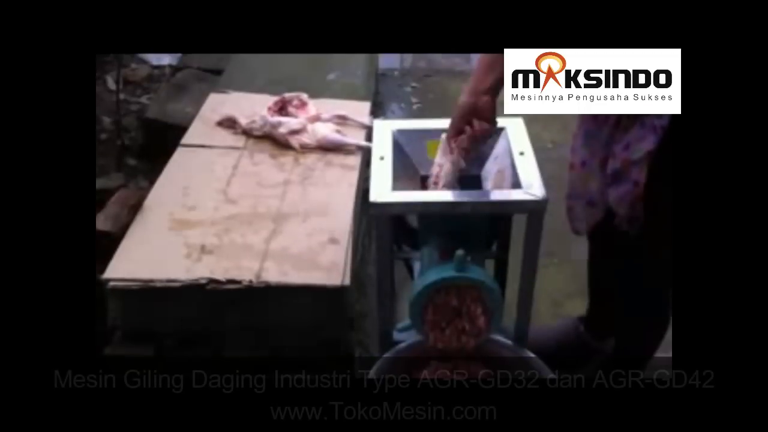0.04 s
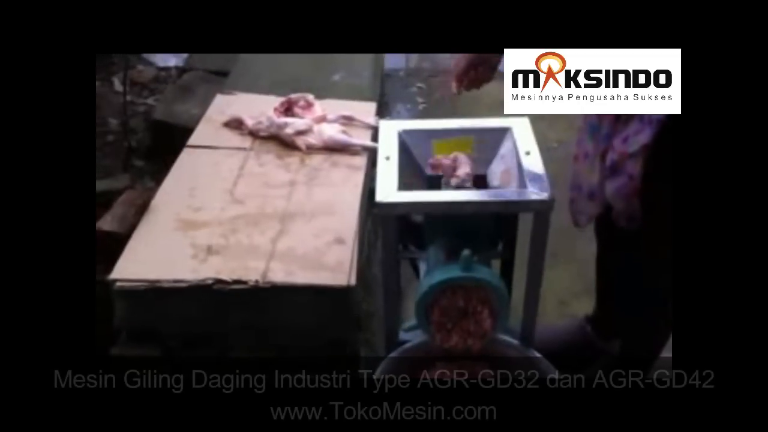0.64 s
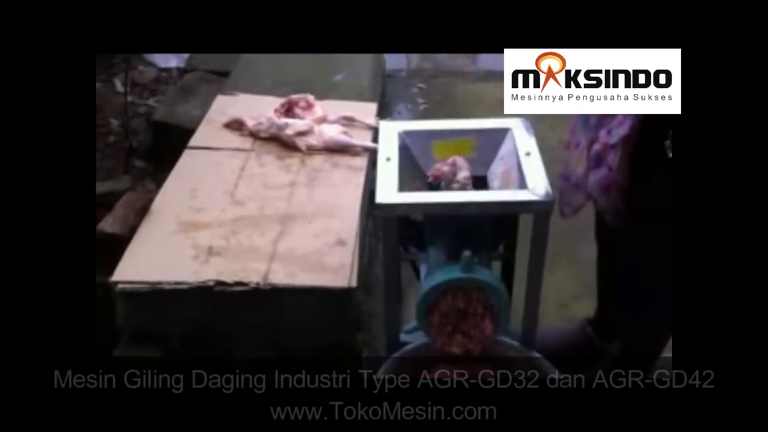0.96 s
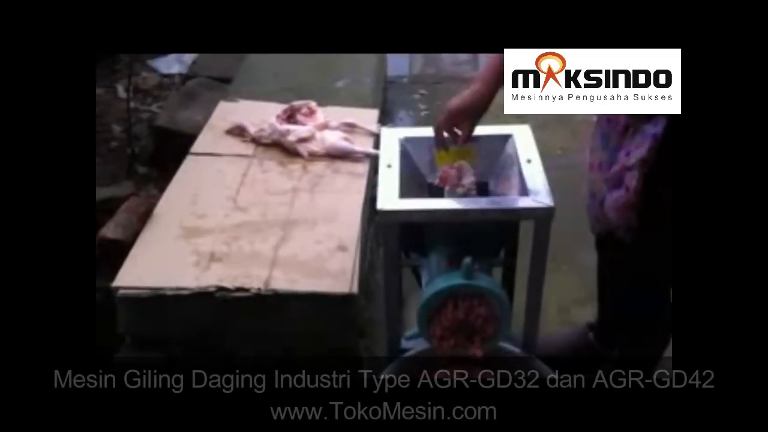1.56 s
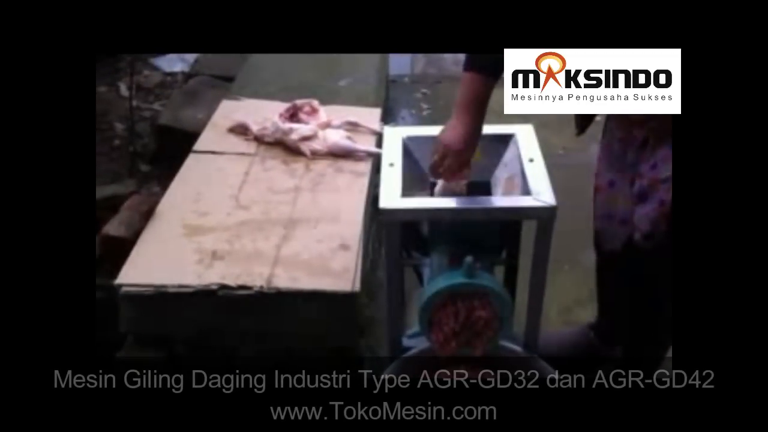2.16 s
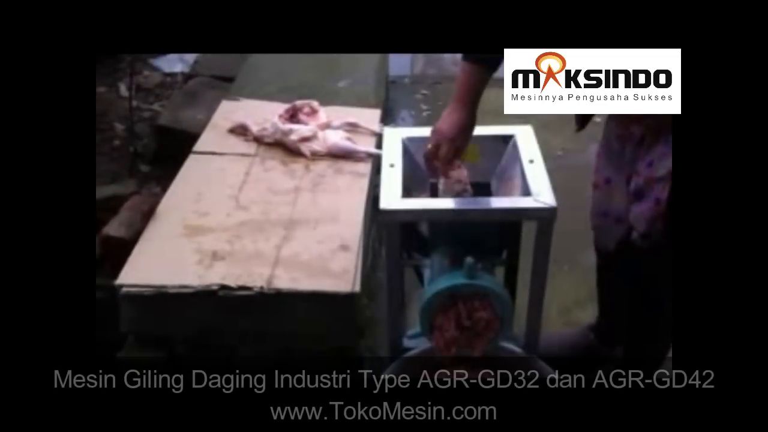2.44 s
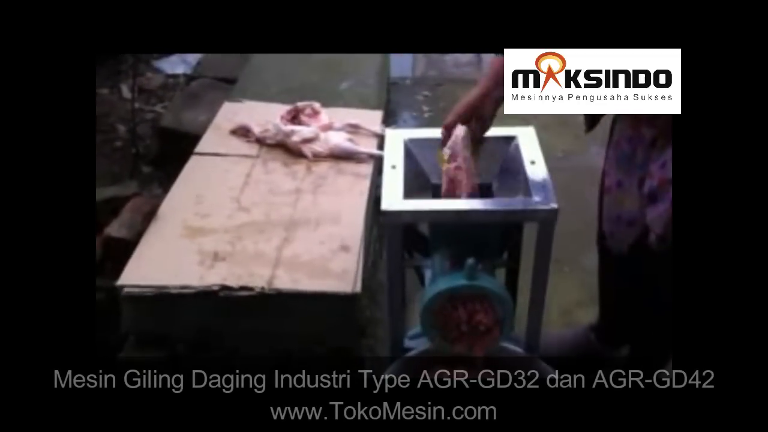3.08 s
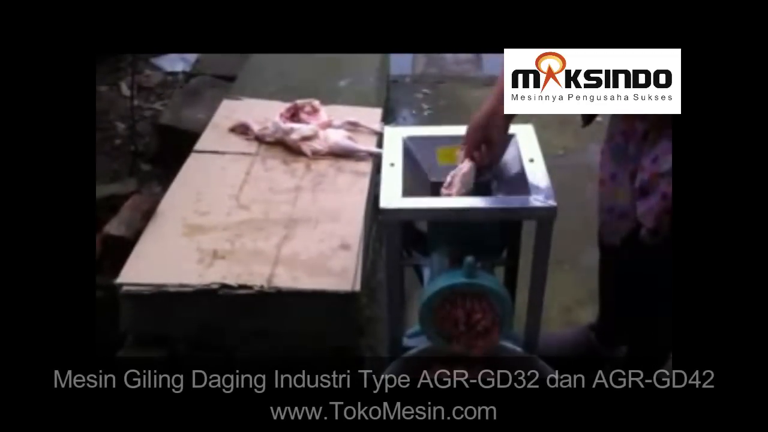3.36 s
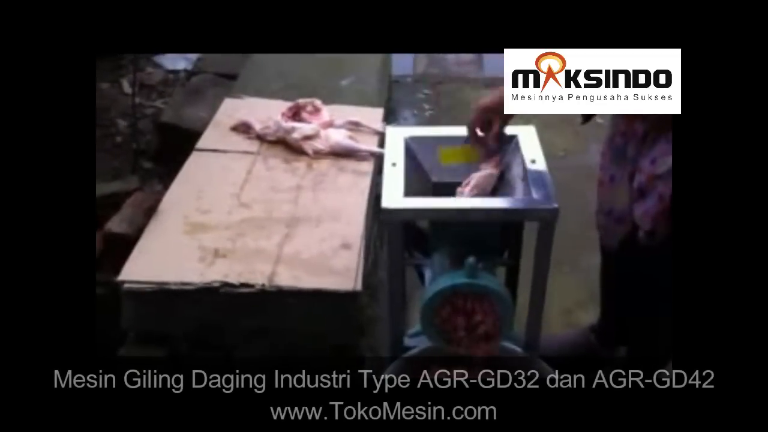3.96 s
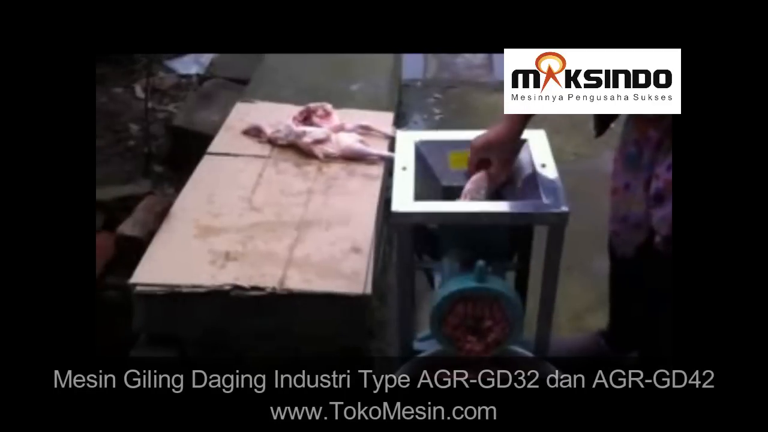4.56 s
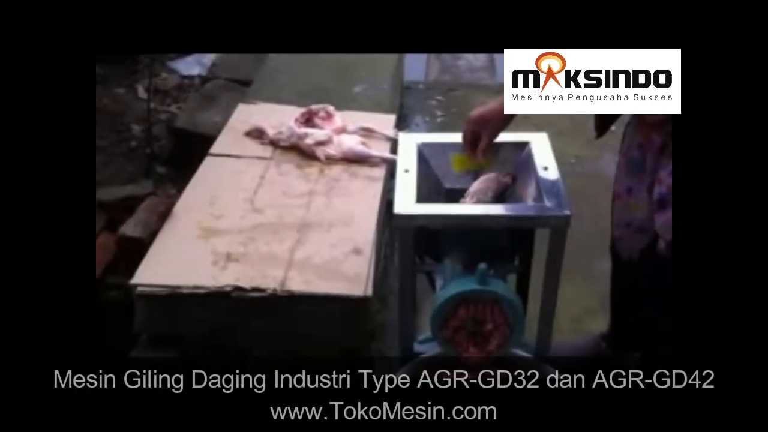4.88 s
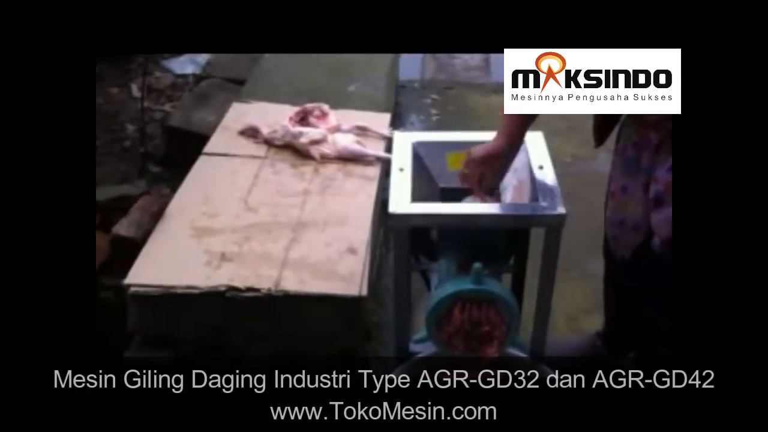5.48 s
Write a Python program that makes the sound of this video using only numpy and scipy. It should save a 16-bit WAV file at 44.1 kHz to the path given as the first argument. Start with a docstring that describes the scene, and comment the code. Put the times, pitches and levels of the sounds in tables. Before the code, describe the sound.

An electric meat grinder runs close to the microphone for about five and a half seconds, over a faint low outdoor rumble. Motor and gears hum with a slight waver, and the screw gives a throbbing drone that rattles the metal housing. A dense, moist crunch of chicken being mashed continues throughout, swelling whenever a piece is caught. Bones crack irregularly, some sharp and some dull, ringing briefly in the steel hopper; stronger cracks come around 0.1, 0.7, 1.1, 2.1 and 3.6 seconds, then cluster from 4.2 to 5.1. Hard lumps knock dully in the barrel, mostly between 0.7 and 1.9 seconds and again from 3.3 to 4.5. Wet gristle snaps and tiny squeaks are scattered through the crunch. The housing judders briefly at about 2.1 and 5.2 seconds, and a sharp, bright bone crack lands near 5.4 as the machine keeps running.

```python
"""Meat grinder in a yard

Outdoors, with the microphone close to an electric grinder being fed chicken pieces. Over the low
rumble of the yard, motor and gears hum and the auger drones and shakes its cast housing. Meat is
mashed with a dense crunch, bones crack and squeak, gristle snaps wetly and hard lumps knock on the
barrel. The crunch and the cracks ring in the steel hopper."""
import sys
import numpy as np
from scipy import signal
from scipy.fft import rfft, irfft
from scipy.io import wavfile
from scipy.ndimage import uniform_filter1d

SR = 44100
rng = np.random.default_rng(int(sys.argv[2]) if len(sys.argv) > 2 else 0)


def to_wav(sig):
    """Store sig (one row per channel, or 1-D mono) as 16-bit WAV at the path in sys.argv[1].

    Samples outside -1..1 are clipped; the rate is SR.
    """
    pcm = np.clip(np.atleast_2d(sig), -1, 1) * 32767
    pcm = np.round(pcm).astype(np.int16)
    wavfile.write(sys.argv[1], SR, pcm.T)  # frames by channels


N = 247842
TIME = np.arange(N) / SR

# Levels are relative within each table; the functions set the balance at the microphone.
# open-air rumble of the yard: (frequency [Hz], level [dB])
YARD_SPECTRUM = [(20, -5.5), (60, -9), (85, 0), (110, 2), (160, 2), (300, -3), (1000, -9.5), (8000, -23)]
# tones of motor and gears: (frequency [Hz], level [dB])
MOTOR_TONES = [(121, -66), (499, -53.5), (575, -57), (693, -51), (852, -49), (1203, -60), (1598, -48)]
# slow rise and fall of the drive's drone, apart from the load: (time [s], level [dB])
DRONE_CURVE = [(0.0, -50.5), (0.5, -40.5), (0.87, -45), (1.38, -39.5), (2.27, -44), (2.61, -42.5),
               (2.72, -41.5), (3.26, -43.5), (3.49, -39), (4.87, -44.5), (5.26, -42.5), (5.62, -41.5)]
# how full the screw is, as the level of its steady mashing: (time [s], level [dB])
SCREW_LOAD = [(0.0, -34.5), (0.08, -34.5), (0.72, -28.5), (1.17, -29), (1.55, -30), (1.97, -30.5),
              (2.22, -33.5), (2.61, -31), (2.74, -33.5), (3.01, -34), (3.13, -33.5), (3.43, -30),
              (3.72, -30), (4.04, -32), (4.99, -29.5), (5.07, -30), (5.56, -31.5), (5.62, -28.5)]
# the screw catches a piece and chews through it: (time [s], length [s], rise of the load [dB])
SCREW_BITES = [(0.059, 0.065, 4.5), (0.28, 0.019, 2), (0.566, 0.25, 1), (1.058, 0.22, 1), (1.532, 0.047, 3),
               (1.759, 0.04, 5), (2.089, 0.068, 4.5), (2.382, 0.25, 3), (2.943, 0.13, 6), (3.176, .08, 3.5),
               (3.47, 0.057, 1.5), (3.81, 0.038, 1.5), (4.222, 0.11, 1.5), (4.42, 0.067, 6),
               (4.61, 0.21, 1), (4.89, .11, 2), (5.115, 0.2, 4.5), (5.454, 0.044, 5.5)]
# modes of housing and stand: (frequency [Hz], width [Hz], gain [dB])
HOUSING_MODES = [(194.4, 5.7, -14), (205, 6.5, -17.5), (264.4, 18, -6.5), (300, 16, 0.5), (323.7, 23, -2.5),
                 (359.6, 12, -2), (407, 11, -25.5), (620.4, 15, -6), (657.4, 25, -4)]
# a tough piece binds and the housing judders: (peak time [s], level [dB], half length [s])
HOUSING_JUDDERS = [(1.195, -45, 0.024), (2.144, -28.5, 0.033), (2.538, -38, 0.027), (4.645, -38, 0.014),
                   (5.18, -26, 0.028)]
# lumps knocking in the barrel: (time [s], level [dB])
LUMP_KNOCKS = [(0.701, -11.5), (1.073, -17), (1.428, -14.5), (1.594, -12.5), (1.796, -16), (1.864, -13.5),
               (3.292, -19), (3.773, -17), (3.938, -17), (4.461, -15)]
# wet mince leaving the plate: (time [s], level [dB])
PLATE_FLOW = [(0.0, -51), (0.34, -51), (0.66, -48.5), (1.38, -44.5), (2.8, -52.5), (3.44, -47.5),
              (4.43, -49.5), (5.12, -47.5), (5.62, -50)]
# gristle snapping: (time [s], level [dB])
GRISTLE_SNAPS = [(0.203, -20.5), (1.521, -16), (1.644, -15), (1.899, -15.5), (2.257, -18), (2.385, -16),
                 (2.512, -13), (2.63, -20.5), (2.946, -13), (2.986, -15.5), (3.863, -21), (4.014, -18.5),
                 (4.471, -14), (4.724, -15.5), (4.844, -17)]
# bright fizz of wet mince and gristle: (frequency [Hz], level [dB])
WET_SPECTRUM = [(1000, -36.5), (4000, -6), (5200, -1), (6100, 5), (7000, 3.5), (8000, -1)]
# squeaks of bone and trapped air: (peak time [s], pitch [Hz], level [dB])
SQUEAK_NOTES = [(0.086, 2090, -25.5), (0.087, 2980, -27), (0.636, 1200, -29.5), (1.223, 651, -30.5),
                (1.523, 4350, -30), (1.573, 2390, -26.5), (2.110, 1108, -24.5), (2.715, 1133, -28),
                (3.508, 1195, -25.5), (3.611, 1162, -27.5), (3.734, 3870, -35.5), (4.477, 692, -33),
                (5.453, 2590, -26.5), (5.468, 1600, -26), (5.567, 640, -32)]
# crunch of mashed meat: (frequency [Hz], level [dB])
CRUNCH_SPECTRUM = [(100, -21.5), (250, 0.5), (520, -4), (750, -3), (1100, 3), (1600, -1), (2000, -1.5),
                   (3000, -2.5), (3600, -4.5), (4300, -7), (5000, -17.5), (8000, -16)]
# bones breaking: (time [s], level [dB], treble against the rest [dB])
BONE_CRACKS = [(0.081, -14, 0.5), (0.627, -18.5, 6), (0.695, -11.5, -4.5), (1.067, -10, -25),
               (1.129, -11, -16), (1.517, -18.5, 7), (1.644, -20.5, 10), (2.098, -16, -16),
               (2.108, -9.5, -15), (2.257, -23.5, 6), (2.385, -16, -15), (2.547, -19.5, 6.5),
               (2.704, -15.5, -9), (2.922, -17.5, -3), (3.066, -21.5, 12.5), (3.17, -17, -20),
               (3.414, -14, -13), (3.606, -10.5, -20), (3.665, -19.5, 5.5), (3.841, -15, -4),
               (4.203, -20.5, -4), (4.245, -12.5, -5), (4.296, -16, -1), (4.434, -11.5, -10),
               (4.473, -9.5, -17), (4.622, -16.5, -1), (4.882, -12, -8), (4.942, -21, 10.5),
               (5.113, -11, -20), (5.447, -9, 4)]
# tone of a breaking bone: (frequency [Hz], level [dB])
BONE_SPECTRUM = [(100, -18), (500, -8.5), (850, 0), (1500, -1.5), (2200, -0.5), (3100, -1), (4200, -6),
                 (5200, -21.5), (8000, -17.5)]
# ringing of the steel hopper: (frequency [Hz], width [Hz], gain [dB])
HOPPER_MODES = [(1010, 46, -4), (1150, 53, -10), (1444, 35, -12), (1563, 220, 0.5), (2080, 180, -9.5),
                (2540, 570, -5), (3110, 100, -2)]


def from_db(db):
    """Decibels to gain."""
    return 10 ** (np.asarray(db) / 20)


def unit_rms(x):
    """Scale to an rms of 1."""
    return x / np.sqrt(np.mean(x ** 2) + 1e-20)


def drift(rate_hz, step=40):
    """Smooth random wander with an rms of about 1, drawn every `step` samples."""
    pole = np.exp(-2 * np.pi * rate_hz * step / SR)
    noise = rng.standard_normal(N // step + 2002)
    slow = signal.lfilter([1], [1, -2 * pole, pole * pole], noise)[2000:]   # once it has settled
    return np.interp(np.arange(N) / step, np.arange(len(slow)), unit_rms(slow))


def swing(curve):
    """A level curve in time, in dB about its mean."""
    db = np.interp(TIME, *np.transpose(curve))
    return db - db.mean()


def colour(x, spectrum, size=4096):
    """Minimum-phase filter shaped like the spectrum; white noise keeps its power."""
    hz, db = np.transpose(spectrum)
    grid_hz = np.maximum(np.arange(size // 2 + 1) * SR / size, 1)
    gain = from_db(np.interp(np.log(grid_hz), np.log(hz), db))
    cepstrum = irfft(np.log(gain))
    cepstrum[1:size // 2] *= 2
    cepstrum[size // 2 + 1:] = 0
    response = irfft(np.exp(rfft(cepstrum)))
    return signal.fftconvolve(x, response / np.linalg.norm(response))[:N]


def resonate(x, modes):
    """Parallel resonances, each with its own peak gain."""
    out = 0
    for hz, width, db in modes:
        r = np.exp(-np.pi * width / SR)
        poles = [1, -2 * r * np.cos(2 * np.pi * hz / SR), r * r]
        out += from_db(db) * (1 - r * r) / 2 * signal.lfilter([1, 0, -1], poles, x + 1e-18)
    return out


def grains(per_s, spread_db, clump_db, friction):
    """Tiny fractures over smooth friction noise, swelling in clumps; rms 1."""
    born = rng.random(N) < per_s / SR
    sizes = from_db(spread_db * np.minimum(rng.exponential(1, N), 4)) * rng.choice([-1, 1], N)
    texture = unit_rms(born * sizes) + friction * rng.standard_normal(N)
    return unit_rms(texture * from_db(clump_db * drift(36)))


def pops(per_s, spread_db, q, pitches=36):
    """Air pockets burst in the mince, each ringing briefly at one of many pitches; rms 1."""
    born = rng.random(N) < per_s / SR
    clicks = born * from_db(spread_db * rng.random(N))
    pitch_index = rng.integers(0, pitches, N)
    return unit_rms(sum(resonate(clicks * (pitch_index == k), [(hz, hz / q, 0)])
                        for k, hz in enumerate(np.geomspace(600, 7900, pitches))))


def fracture(start_s, decay_s, first_db, size=6000):
    """One sharp first break and a quickly fading run of splinters."""
    out, at = np.zeros(N + size), int(start_s * SR)
    age = np.arange(size) / SR
    strength = np.exp(-age / decay_s) + from_db(first_db) * np.exp(-age / 0.00046)
    out[at:at + size] = rng.choice([-1, 1], size) * strength
    return out[:N]


def yard(level_db):
    """Steady low rumble of the open air behind the grinder."""
    return from_db(level_db) * colour(rng.standard_normal(N), YARD_SPECTRUM)


def near_echoes(direct, t60_s, echo_db, size=16000):
    """The direct sound reaches the microphone, then scatter from hopper sides, table and walls."""
    age = np.arange(size) / SR
    tail = rng.standard_normal(size) * from_db(-60 * age / t60_s) * (age > 0.002)
    return direct + from_db(echo_db) * signal.fftconvolve(direct, tail / np.linalg.norm(tail))[:N]


def motor(load_db, waver_hz, flutter_db, gain_db, follows_load):
    """Motor and gear tones waver, flutter and swell with the load."""
    out, lowest_hz = 0, MOTOR_TONES[0][0]
    for hz, db in MOTOR_TONES:
        pitch = hz + waver_hz * np.sqrt(hz / lowest_hz) * drift(8)
        gain = from_db(db + gain_db + flutter_db * drift(7))
        out += gain * np.sin(2 * np.pi * np.cumsum(pitch) / SR)
    return out * from_db(follows_load * load_db)


def bites(attack_s, release_s):
    """Each bite of the screw raises the load quickly, holds while the piece lasts and lets go; dB."""
    return sum(db * np.interp(TIME - start, [0, attack_s, length, length + release_s], [0, 1, 1, 0])
               for start, length, db in SCREW_BITES)


def drive(load_db, bite_db, mean_hz, sag_hz_per_db, throbs_per_s):
    """Under load the drive drones louder and lower, and it throbs several times a second; gives (dB, Hz)."""
    throb_db = 0.5 * np.cos(2 * np.pi * throbs_per_s * (TIME - 0.039))
    unsteady_db = 2 * drift(20)
    strain_db = 0.38 * load_db + 0.3 * bite_db
    drone_db = -38 + 0.65 * swing(DRONE_CURVE) + strain_db + throb_db + unsteady_db
    return drone_db, mean_hz - sag_hz_per_db * load_db


def knocks(gain_db, contact_s):
    """Hard lumps strike the barrel: single dull blows that ring the housing."""
    blows = sum(from_db(db + gain_db) * np.exp(-((TIME - at) / contact_s) ** 2)
                for at, db in LUMP_KNOCKS)
    return resonate(blows, HOUSING_MODES)


def auger(drone_db, drone_hz, hum_db, shake_db):
    """The turning screw hums and shakes its housing, harder when a tough piece binds."""
    phase = 2 * np.pi * np.cumsum(drone_hz + 10 * drift(21.9)) / SR
    hum = np.sqrt(2) * np.sin(phase) * from_db(2.8 * drift(25))
    shake = resonate(grains(per_s=1200, spread_db=2.5, clump_db=2.5, friction=0.96), HOUSING_MODES)
    shake /= np.sqrt(uniform_filter1d(shake ** 2, size=2400) + 1e-20)   # the drive force is even
    binding = sum(from_db(db) * np.exp(-((TIME - at) / half_s) ** 2)
                  for at, db, half_s in HOUSING_JUDDERS)
    return (from_db(drone_db) + binding) * (from_db(hum_db) * hum + from_db(shake_db) * shake)


def housing(vibration, cutoff_hz):
    """The small cast body radiates little bass towards the microphone."""
    return signal.sosfilt(signal.butter(2, cutoff_hz, "high", fs=SR, output="sos"), vibration)


def squelch(flow_db, gain_db, snap_db, snap_s):
    """Wet mince crackles through the plate and gristle snaps."""
    fizz = grains(per_s=500, spread_db=2, clump_db=1.5, friction=0.57)
    fizz += 0.31 * pops(per_s=650, spread_db=11.5, q=56)
    snaps = sum(from_db(db + snap_db) * fracture(at, snap_s, first_db=-7.5) for at, db in GRISTLE_SNAPS)
    return colour(from_db(flow_db + gain_db) * unit_rms(fizz) + snaps, WET_SPECTRUM)


def squeaks(gain_db, half_length_s, waver):
    """Bone rubs on steel and air is squeezed out: short, rough, unsteady notes."""
    out = np.zeros(N)
    bend = 1 + waver * drift(110)
    roughness = unit_rms(from_db(1.6 * drift(150)))
    for at, hz, db in SQUEAK_NOTES:
        near = np.abs(TIME - at) < 4 * half_length_s
        phase = 2 * np.pi * np.cumsum(hz * bend[near]) / SR
        envelope = np.exp(-((TIME[near] - at) / half_length_s) ** 2)
        out[near] += from_db(db + gain_db) * np.sqrt(2) * np.sin(phase) * envelope
    return out * roughness


def meat(crunch_db, gain_db):
    """Meat and bone chips are mashed between screw and barrel."""
    mash = grains(per_s=1100, spread_db=0, clump_db=0.78, friction=0.75)
    mash += 0.43 * pops(per_s=600, spread_db=8, q=37)
    return from_db(crunch_db + gain_db) * colour(unit_rms(mash), CRUNCH_SPECTRUM)


def bones(gain_db, treble_hz, crumble_s, sponginess):
    """Each bone cracks and crumbles for milliseconds; the duller, spongier ones for longer."""
    body, edge = np.zeros(N), np.zeros(N)
    for at, db, treble_db in BONE_CRACKS:
        decay_s = crumble_s * from_db(-sponginess * treble_db)
        crack = from_db(db + gain_db) * fracture(at, decay_s, first_db=-15.5)
        body += crack
        edge += from_db(treble_db) * crack
    lows = signal.butter(1, treble_hz, fs=SR)
    shelved = edge + signal.lfilter(*lows, body - edge)   # body below treble_hz, edge above
    return colour(shelved, BONE_SPECTRUM)


def scene():
    """The grinder close to a single microphone, with the yard behind it."""
    load_db, bite_db = swing(SCREW_LOAD), bites(attack_s=0.012, release_s=0.036)
    crunch_db = load_db + bite_db + drift(15)
    flow_db = swing(PLATE_FLOW) + bite_db + 1.74 * drift(15)
    crushing = meat(crunch_db, gain_db=-34.5)
    crushing += bones(gain_db=-7.5, treble_hz=2020, crumble_s=0.0075, sponginess=0.16)
    crushing += resonate(crushing, HOPPER_MODES)
    crushing += squeaks(gain_db=-0.5, half_length_s=0.011, waver=0.041)
    crushing += squelch(flow_db, gain_db=-43.5, snap_db=-10, snap_s=0.0056)
    hum = motor(load_db, waver_hz=1.793, flutter_db=6, gain_db=-3, follows_load=0.38)
    drone_db, drone_hz = drive(load_db, bite_db, mean_hz=318.2, sag_hz_per_db=1, throbs_per_s=7.62)
    vibration = auger(drone_db, drone_hz, hum_db=-5.5, shake_db=-3.5)
    vibration += knocks(gain_db=7, contact_s=0.00029)
    machine = hum + housing(vibration, cutoff_hz=141)
    return (yard(level_db=-56) + machine + near_echoes(crushing, t60_s=0.15, echo_db=-12))[None]


def low_pass(x, hz):
    """A very steep low-pass."""
    taps = signal.firwin(401, hz, fs=SR, window=("kaiser", 8))
    return signal.fftconvolve(x, taps[None], mode="same")


def record(dry):
    """The recorder runs at half rate; straight lines between samples mirror the treble faintly up."""
    half_rate = low_pass(dry, hz=8150)[0, ::2]
    joined = np.interp(TIME, TIME[::2], half_rate)
    return low_pass(joined[None], hz=15900)


dry = scene()
out = record(dry)
to_wav(out)
```